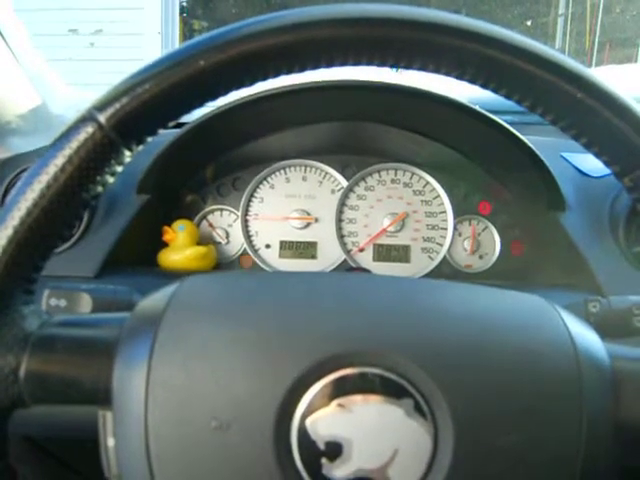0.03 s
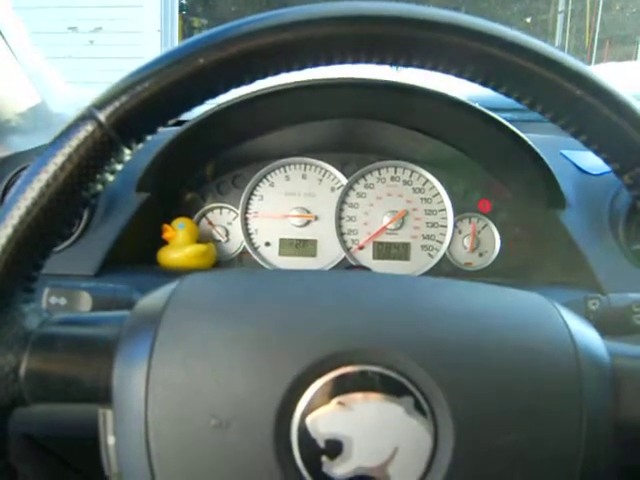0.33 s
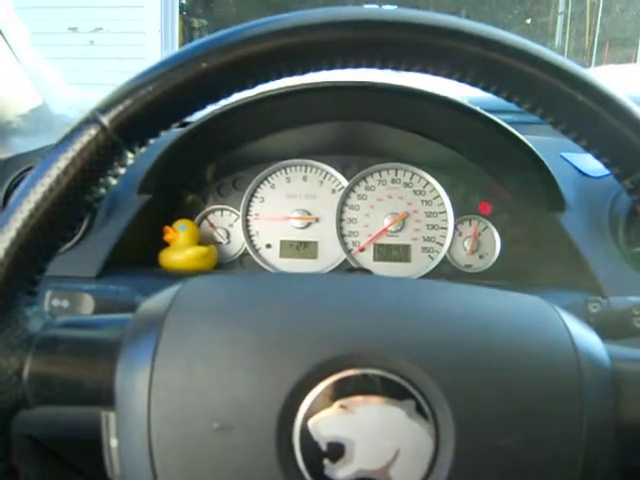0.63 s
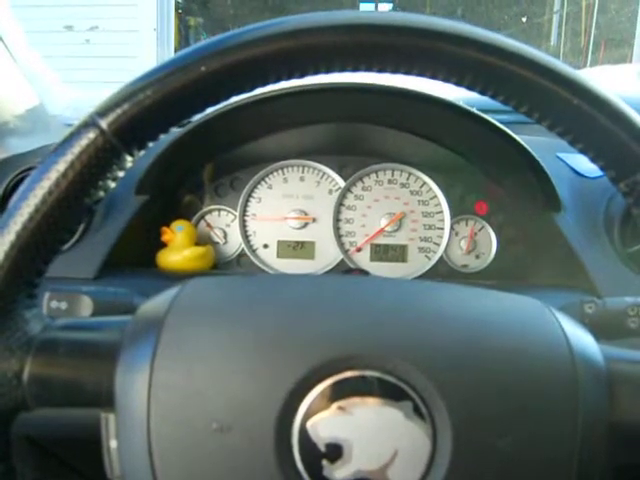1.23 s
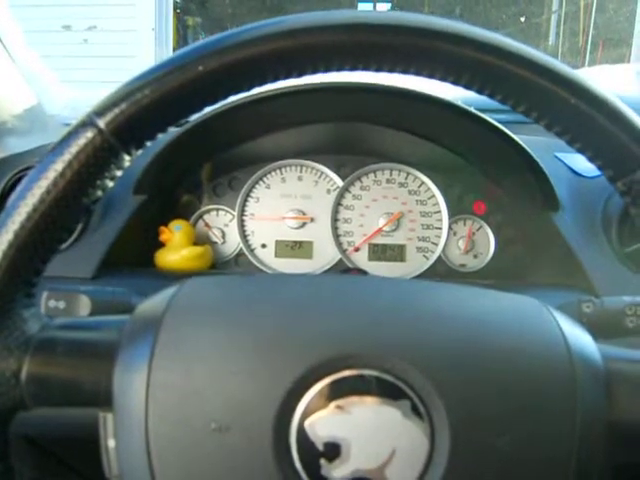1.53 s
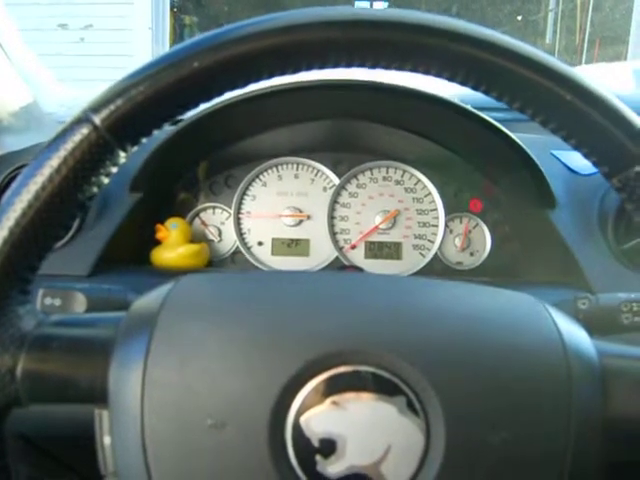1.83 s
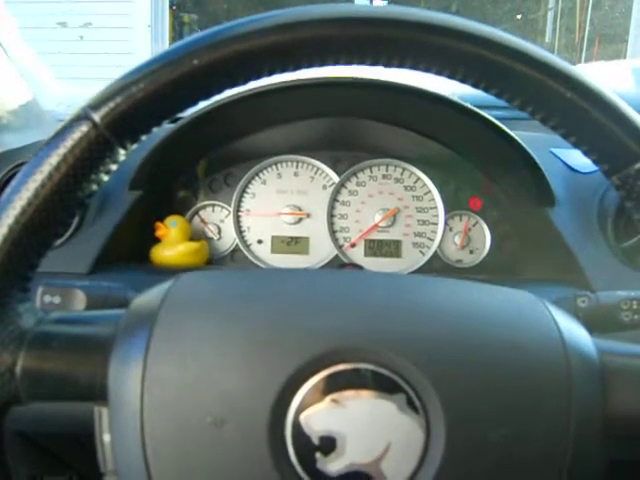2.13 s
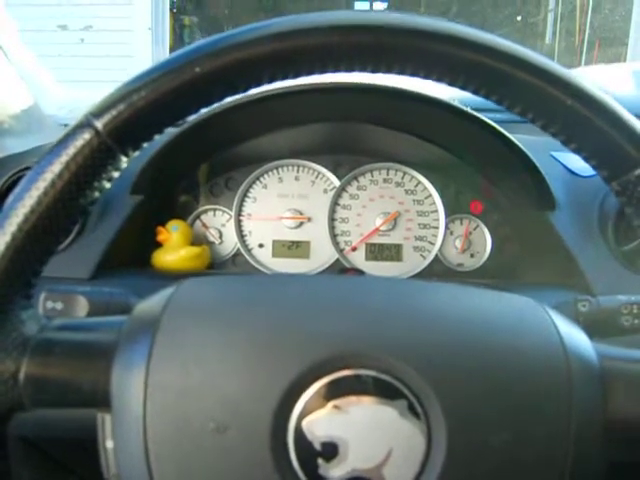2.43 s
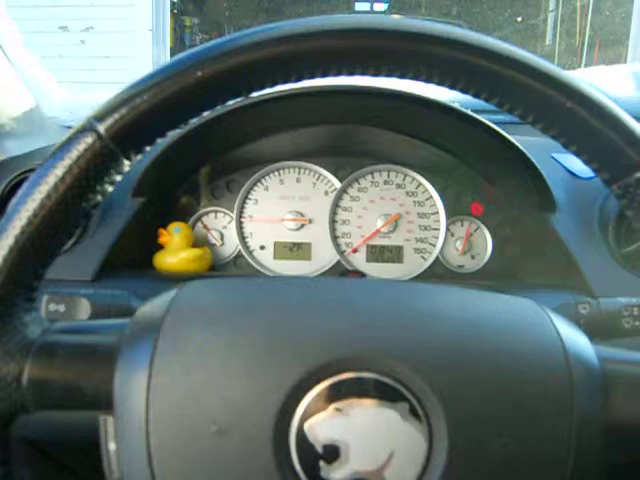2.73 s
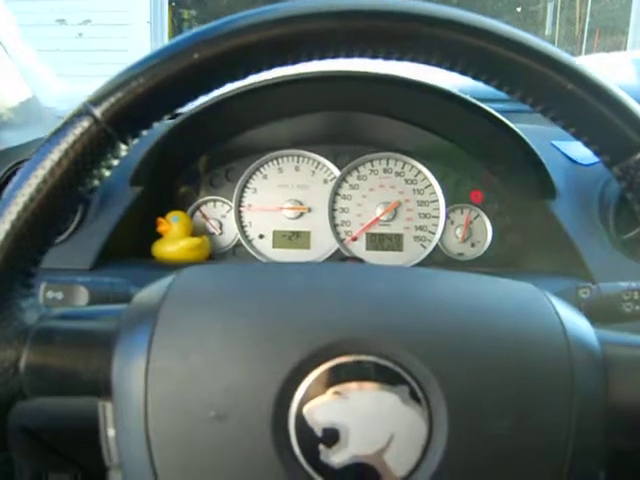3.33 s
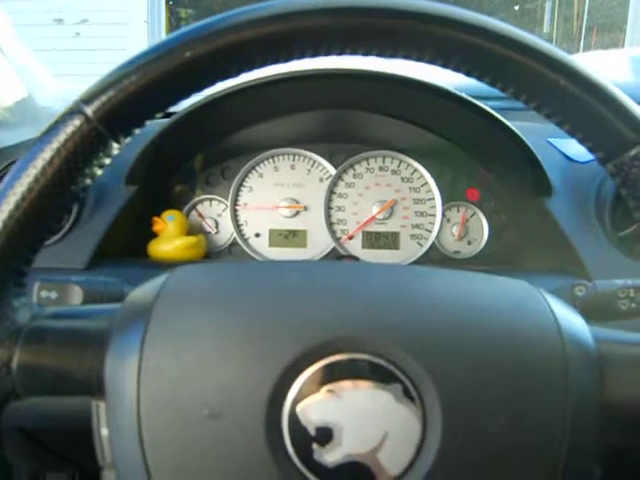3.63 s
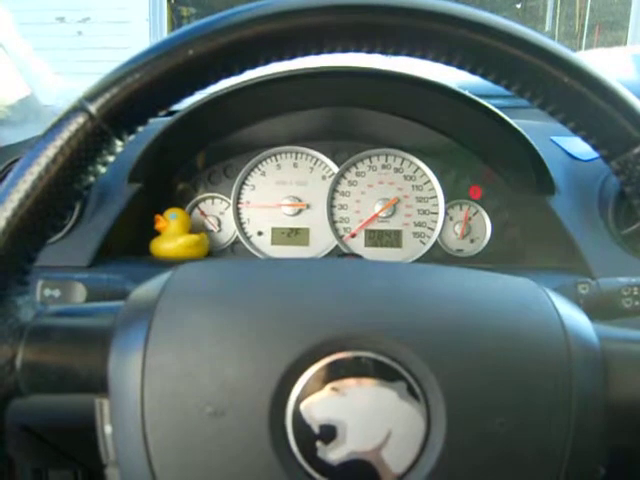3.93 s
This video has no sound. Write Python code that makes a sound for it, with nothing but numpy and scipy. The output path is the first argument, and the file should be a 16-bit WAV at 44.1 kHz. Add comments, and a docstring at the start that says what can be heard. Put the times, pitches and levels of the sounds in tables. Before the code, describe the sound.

A cold car engine idles fast throughout, heard from the driver's seat as a low throbbing rumble with dull clatter and hiss. A pump hums and whines over it from the start, with a few faint belt chirps. The whine grows shriller from about 1.5 seconds, squeals most around 2.5 to 3 seconds, then dies down by 3.5 seconds as the engine's rumble gets slightly stronger.

```python
"""Cold six-cylinder at fast idle

Heard from the driver's seat. Crank orders throb in the cabin over combustion rumble, valve clatter
and engine bay hiss. The belt drives a whining vane pump, a faintly singing alternator and a
chafing pulley. The whine grows shrill, then dies down after three seconds."""
import sys
import numpy as np
from scipy import signal
from scipy.fft import rfft, irfft
from scipy.io import wavfile
from scipy.ndimage import uniform_filter1d

SR = 44100
rng = np.random.default_rng(int(sys.argv[2]) if len(sys.argv) > 2 else 0)


def wav_record(signal):
    """Record a signal, one row per channel, as 16-bit PCM in the file named by sys.argv[1]."""
    frames = np.transpose(np.atleast_2d(signal))
    bounded = np.clip(frames, -1, 1)
    # unit amplitude maps onto the largest positive 16-bit level
    quanta = np.round(bounded * 32767).astype(np.int16)
    wavfile.write(sys.argv[1], SR, quanta)


N = 176400
T = np.arange(N) / SR


def undb(db):
    """Decibels to gain."""
    return 10 ** (np.asarray(db) / 20)


def curve(rows):
    """Straight lines through (t/s, value) rows."""
    return np.interp(T, *np.array(rows, float).T[:2])


def walk(rate_hz):
    """Smooth random wander, spread near 1."""
    hold = int(SR / rate_hz)
    steps = np.repeat(rng.standard_normal(N // hold + 2), hold)[rng.integers(hold):]
    return 1.3 * uniform_filter1d(uniform_filter1d(steps, hold), hold)[:N]


def noise(colour):
    """Unit-RMS noise with spectral gain colour(f/Hz)."""
    hz = np.maximum(np.arange(N // 2 + 1) * SR / N, 1)
    x = irfft(rfft(rng.standard_normal(N)) * colour(hz), N)
    return x / x.std()


def shaped(points):
    """Unit-RMS noise through (f/Hz, level/dB) rows, falling 12 dB/octave outside."""
    hz, db = np.array(points, float).T
    return noise(lambda f: undb(np.interp(np.log(f), np.log(hz), db))
                 * np.minimum(f / hz[0], 1) ** 2 * np.minimum(hz[-1] / f, 1) ** 2)


def resonance(hz, width_hz):
    """Unit-RMS noise in one steep resonance."""
    return noise(lambda f: 1 / (1 + ((f - hz) / width_hz) ** 2))


def tone(turns):
    """Unit-RMS sine, random start phase."""
    return np.sqrt(2) * np.sin(2 * np.pi * (turns + rng.random()))


def swell(turns, depth):
    """One swell per turn."""
    return 1 + depth * np.cos(2 * np.pi * turns)


# pump vane rate, tied to engine speed: t/s, f/Hz
VANE_HZ = [(0, 348.4), (0.15, 348.7), (0.47, 350), (0.8, 347.4), (1.05, 346.8), (1.27, 348.8),
           (1.45, 347.5), (1.7, 344.8), (2, 345.6), (2.25, 344.1), (2.55, 345.2), (2.95, 343.8),
           (3.3, 343.1), (3.55, 343.5), (3.75, 341.6), (4, 342)]
VANES_PER_REV, ALTERNATOR_PER_REV, PULLEY_PER_REV, FIRINGS_PER_REV = 21.96, 2.222, 2.396, 3


def crankshaft():
    """Crank angle in turns; the idle sags and jitters slightly."""
    vane_hz = curve(VANE_HZ) * (1 + 0.00052 * walk(29.96))
    return np.cumsum(vane_hz) / VANES_PER_REV / SR


# engine lines: multiple of crank rate
ENGINE_ORDERS = np.array([2, 3, 4, 6, 7, 9, 11, 12, 14, 15, 16, 17, 18, 19, 24, 25, 29, 30])
# per order: level/dB
ENGINE_DB = [-31.5, -31, -32, -49.5, -41, -44.5, -45, -27.5, -45.5, -41.5, -38.5, -43.5, -33.5, -51.5,
             -42.5, -42.5, -53, -38.5]
# cabin boom: t/s, level/dB
BOOM_DB = [(0, -7.5), (.8, -3), (1.45, -3.5), (1.6, -1), (2.6, -1.5), (3.2, -1), (3.6, 1.5), (4, 3.5)]
# second-order throb: t/s, level/dB
THROB_DB = [(0, -13), (.65, -3.5), (1.06, -2), (1.39, -12), (1.65, 1.5), (2.15, 0.5), (2.35, -9),
            (3.15, 3.5), (3.8, -8), (4, 4.5)]
# combustion rumble: f/Hz, level/dB
RUMBLE_SPECTRUM = [(20, -10), (45, -3), (80, -2), (100, -7.5), (125, -2), (170, -0.5), (230, -1),
                   (300, -10), (400, -21.5), (600, -29)]


def engine(crank):
    """Crank orders boom in the cabin; combustion rumble swells with each firing."""
    crank_hz, full_boom_above_hz = VANE_HZ[0][1] / VANES_PER_REV, 150
    boom_db, lines = curve(BOOM_DB), 0
    for order, db in zip(ENGINE_ORDERS, ENGINE_DB):
        if order == 2:
            lift_db = curve(THROB_DB)
        else:
            lift_db = boom_db * (1 if order * crank_hz > full_boom_above_hz else .5)
        lines += undb(db + lift_db + 0.93 * walk(9)) * tone(order * crank)
    rumble = undb(-29.5 + .45 * boom_db) * shaped(RUMBLE_SPECTRUM)
    return lines + rumble * swell(FIRINGS_PER_REV * crank, depth=0.23)


# clatter: t/s, level/dB
CLATTER_DB = [(0, -37.5), (.7, -34), (1.3, -38.5), (2.3, -38), (3.2, -36), (4, -30.5)]
# clatter: f/Hz, level/dB
CLATTER_SPECTRUM = [(500, -13.5), (600, -0.5), (690, 2.5), (780, -8), (930, -3.5), (1250, -4.5),
                    (1400, -15.5)]


def valve_train(crank):
    """Dense, dull clatter, swelling with each firing."""
    clatter = undb(curve(CLATTER_DB)) * shaped(CLATTER_SPECTRUM)
    return clatter * swell(FIRINGS_PER_REV * crank, depth=.25)


# pump fundamental: t/s, level/dB
HUM_DB = [(0, -25.5), (.4, -22.5), (1.3, -24.5), (1.95, -27), (2.5, -34.5), (2.95, -32), (3.3, -35.5),
          (4, -43)]
# pump harmonics from the 2nd up: level/dB
HARMONIC_DB = [-35, -35.5, -27, -35, -25, -39.5, -29.5, -38.5, -36, -36.5, -42, -47, -52, -51, -54, -55,
               -51, -52, -53, -51]
# harmonics 2-5: t/s, level/dB
LOW_WHINE_DB = [(0, -10), (.8, -7), (1.5, -2.5), (1.9, -.3), (2.35, -.3), (2.55, -5.5), (2.9, -9),
                (3.25, -18), (4, -17)]
# harmonic 6: t/s, level/dB
SIXTH_DB = [(0, -7), (.5, -5.5), (.57, -3), (1.35, .5), (1.52, -2), (1.6, -18), (3.55, -22), (3.72, -12),
            (4, -15)]
# harmonics 7 and up: t/s, level/dB
HIGH_WHINE_DB = [(0, -14), (1.1, -8.5), (1.7, -4), (2.2, -1.5), (2.5, 1), (2.95, 0), (3.2, -9.5), (4, -26)]
# flares of the nearest harmonic: start/s, end/s, f/Hz, lift/dB
SQUEALS = [(0, .6, 1745, 11), (.9, 1.58, 1040, 5), (1.48, 1.68, 2420, 10), (1.58, 2.3, 3800, 6),
           (2.12, 2.42, 1725, 6), (2.36, 2.75, 3450, 4.5), (2.55, 3.2, 690, 9), (2.62, 2.76, 4140, 7),
           (2.62, 3.45, 4470, 15), (2.64, 3.15, 1720, 11), (2.65, 3.1, 5160, 9), (2.76, 3.08, 2410, 8),
           (2.76, 3.45, 4815, 15)]


def pump(crank):
    """Vane pressure ripple: a hum and wavering harmonics, some flaring into a squeal."""
    vanes, mean_vane_hz = VANES_PER_REV * crank, np.array(VANE_HZ)[:, 1].mean()
    waver_db, flutter_db, ramp_s = 1.5, 0.6, 0.029
    ripple = undb(curve(HUM_DB)) * tone(vanes)
    for k, db in enumerate(HARMONIC_DB, 2):
        if k == 6:
            level_db = db + curve(SIXTH_DB)
        else:
            level_db = db + curve(LOW_WHINE_DB if k < 6 else HIGH_WHINE_DB) + waver_db * walk(4)
        for start, end, hz, lift_db in SQUEALS:
            if round(hz / mean_vane_hz) == k:
                level_db += lift_db * np.clip(np.minimum(T - start, end - T) / ramp_s + .5, 0, 1)
        ripple += undb(level_db + flutter_db * walk(39.96)) * tone(k * vanes)
    return ripple


# alternator lines: multiple of shaft rate
SHAFT_ORDERS = np.array([6, 36, 72, 78, 114])
# per order: level/dB
SHAFT_DB = [-37, -48.5, -37.5, -57, -38.5]


def alternator(crank):
    """Faint, unsteady lines from the poles and slots, slowly growing louder."""
    shaft = ALTERNATOR_PER_REV * crank
    waver_db, rise_db_per_s = 1.56, 0.7
    lines = sum(undb(db + waver_db * walk(25)) * tone(order * shaft)
                for order, db in zip(SHAFT_ORDERS, SHAFT_DB))
    return lines * undb(rise_db_per_s * (T - T.mean()))


# belt chafe: t/s, level/dB
CHAFE_DB = [(0, -37.5), (.65, -36.5), (1.4, -37), (2.2, -34.5), (2.8, -37), (3.2, -37.5), (4, -36)]
# belt chirps: t/s, peak level/dB
BELT_CHIRPS = [(.277, -25.5), (.594, -23), (.832, -23.5), (.965, -22.5), (1.967, -19), (2.26, -23),
               (2.366, -21.5), (2.708, -25), (2.786, -23)]


def pulley(crank):
    """The belt chafes unevenly once per pulley turn and now and then chirps."""
    ring_hz, scatter_db, chirp_sigma_s = 1468, 2.5, .005
    chafe = resonance(ring_hz, width_hz=37) * swell(PULLEY_PER_REV * crank, depth=0.74)
    chafe *= undb(scatter_db * walk(35.12))
    chirps = sum(undb(db) * np.exp(-((T - at) / chirp_sigma_s) ** 2 / 2) * tone(ring_hz * T)
                 for at, db in BELT_CHIRPS)
    return undb(curve(CHAFE_DB)) * chafe / chafe.std() + chirps


# bay hiss: t/s, level/dB
HISS_DB = [(0, -30), (.7, -27.5), (2.2, -25), (3.0, -26.5), (3.3, -26), (4, -27)]
# bay hiss: f/Hz, level/dB
HISS_SPECTRUM = [(350, -7), (450, -5.5), (530, -13), (620, -6.5), (720, -8.5), (800, -11.5), (930, -9.5),
                 (1280, -10), (1430, -9), (1610, -11), (1950, -12), (2250, -10.5), (2500, -13.5),
                 (2900, -9), (3400, -12.5), (4100, -10.5), (4600, -14), (5600, -14.5), (6400, -18),
                 (7200, -20), (7600, -26.5), (7950, -40.5), (8450, -38), (8950, -54.5)]
# panel resonances: f/Hz, width/Hz, level/dB
PANEL_MODES = [(2418, 82, -37.5), (4040, 170, -42.5), (2000, 35, -40), (486, 69, -42)]


def engine_bay(crank):
    """Intake and belt hiss with panel resonances, pulsing lightly with the firings."""
    hiss = undb(curve(HISS_DB)) * shaped(HISS_SPECTRUM)
    panels = sum(undb(db) * resonance(hz, width_hz) for hz, width_hz, db in PANEL_MODES)
    flicker = undb(0.08 * walk(30))
    return (hiss + panels) * swell(FIRINGS_PER_REV * crank, depth=.05) * flicker


def scene():
    """Mono sum; everything turns with the crankshaft."""
    crank = crankshaft()
    sources = (engine, valve_train, pump, alternator, pulley, engine_bay)
    return sum(source(crank) for source in sources)[None]


def record(dry):
    """Steep treble cut."""
    cutoff_hz = 9000
    return signal.sosfilt(signal.ellip(10, .2, 90, cutoff_hz, fs=SR, output="sos"), dry)


dry = scene()
out = record(dry)
wav_record(out)
```